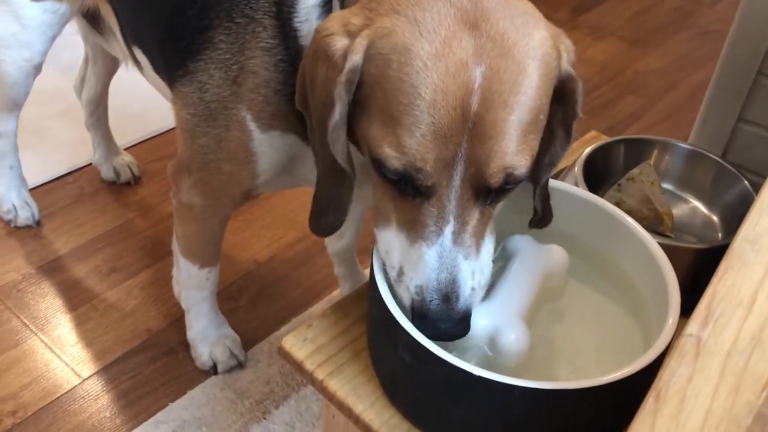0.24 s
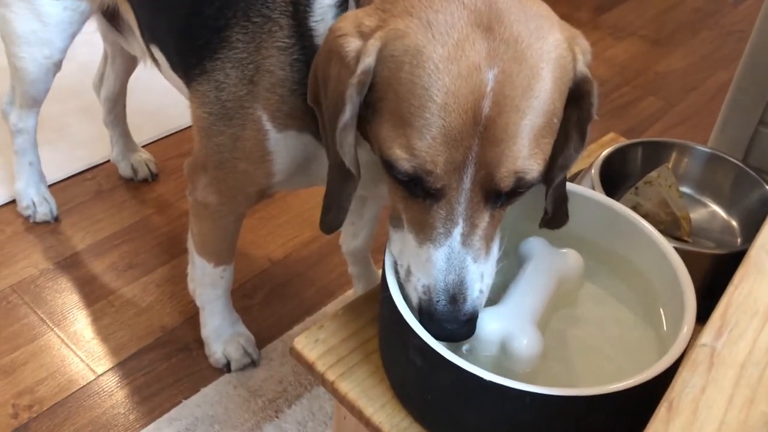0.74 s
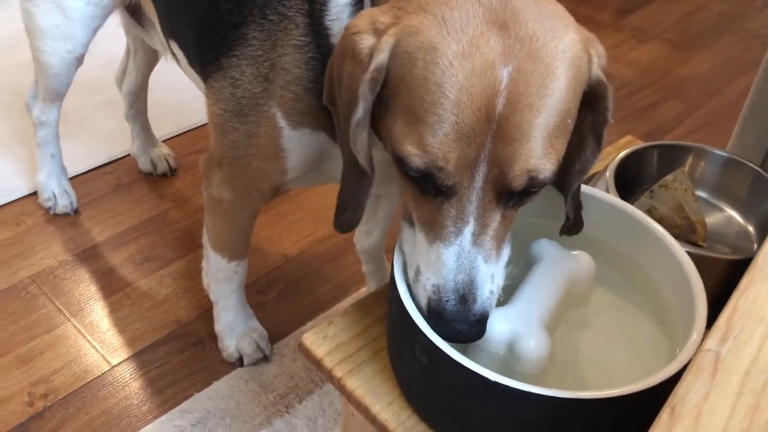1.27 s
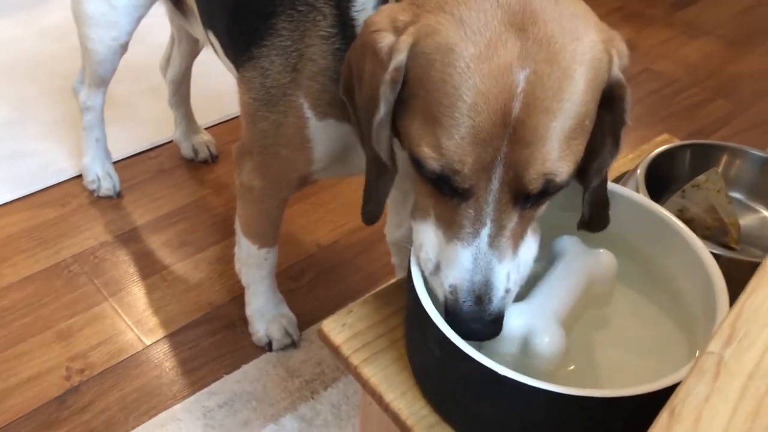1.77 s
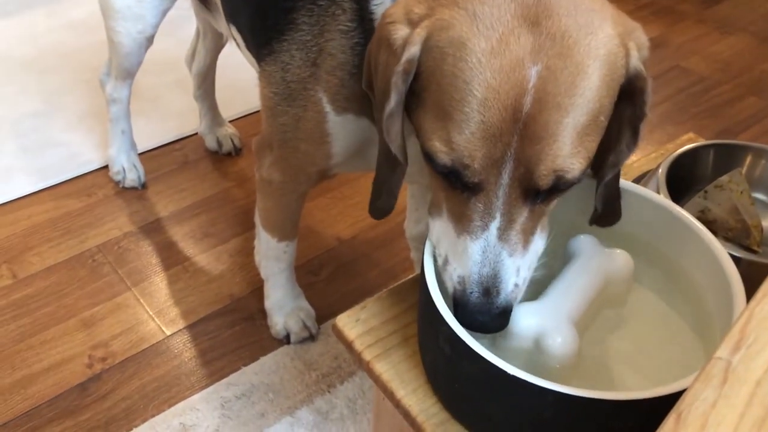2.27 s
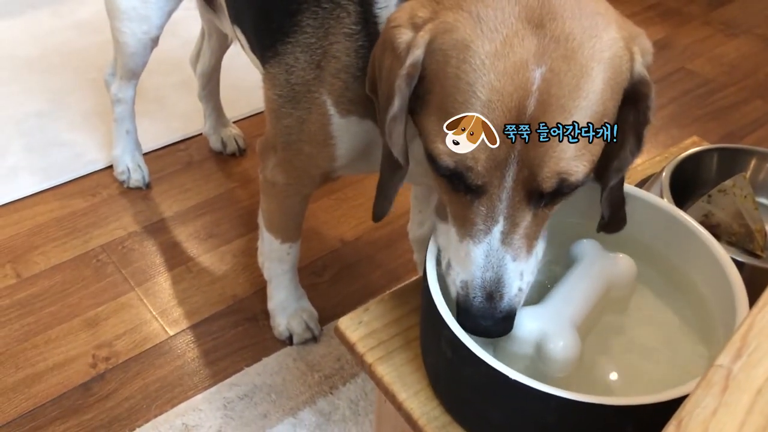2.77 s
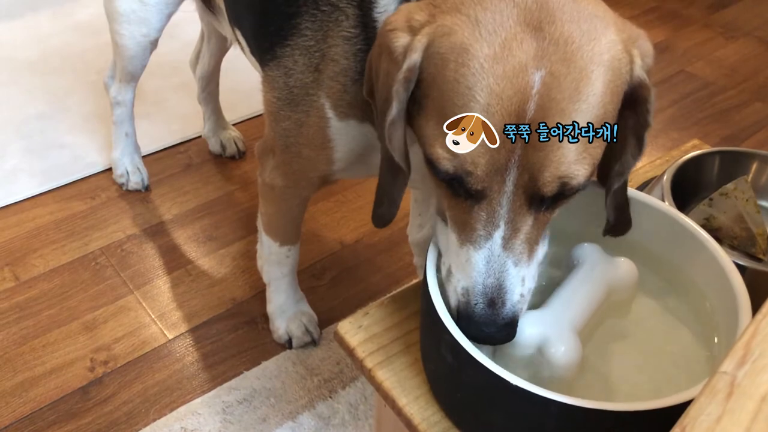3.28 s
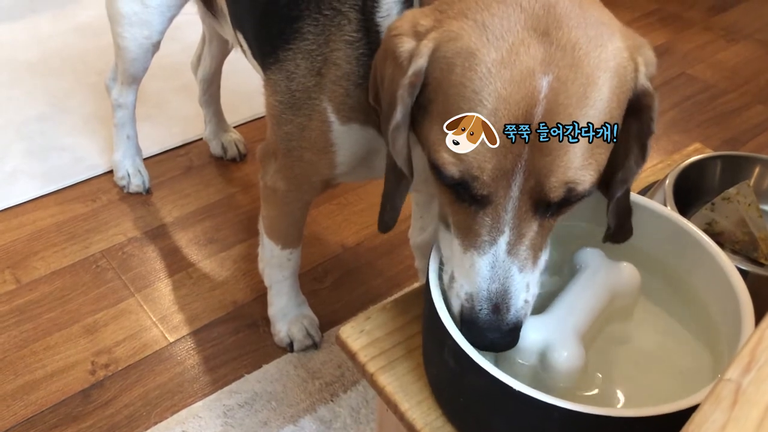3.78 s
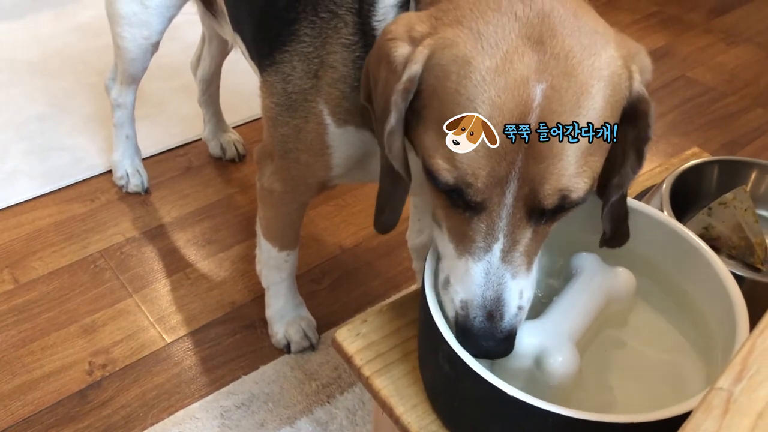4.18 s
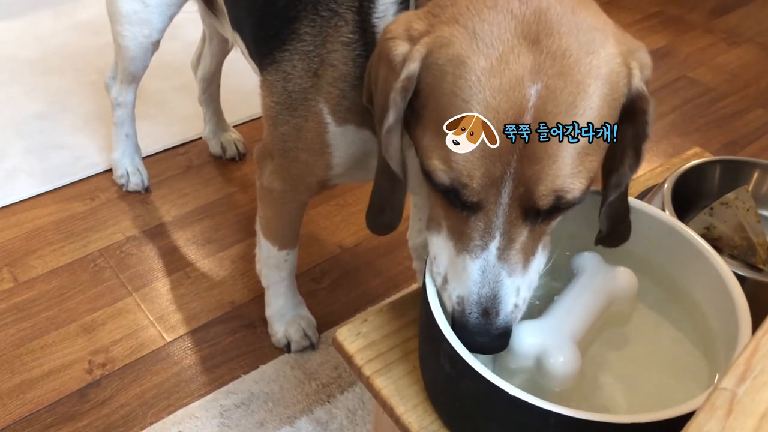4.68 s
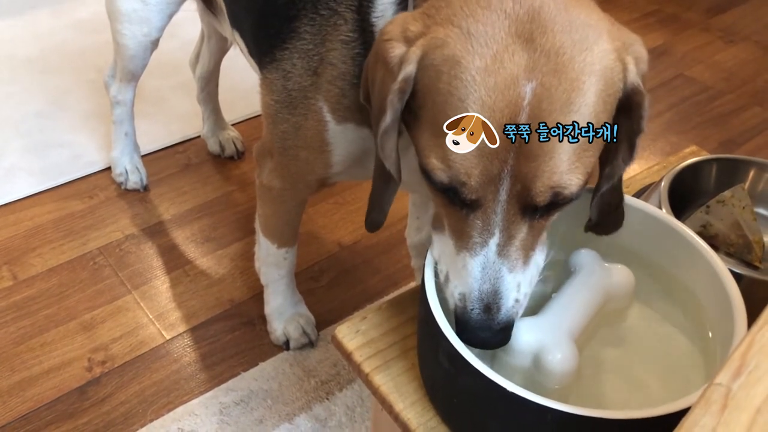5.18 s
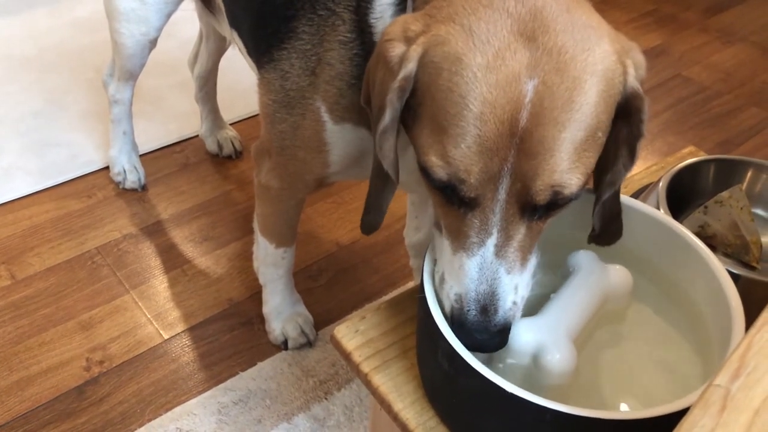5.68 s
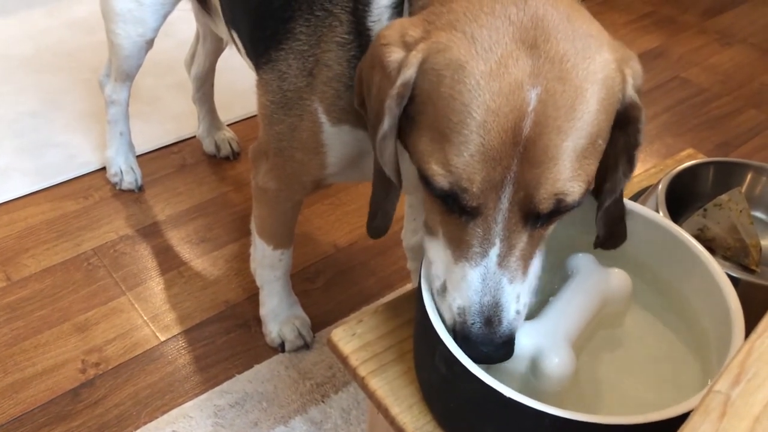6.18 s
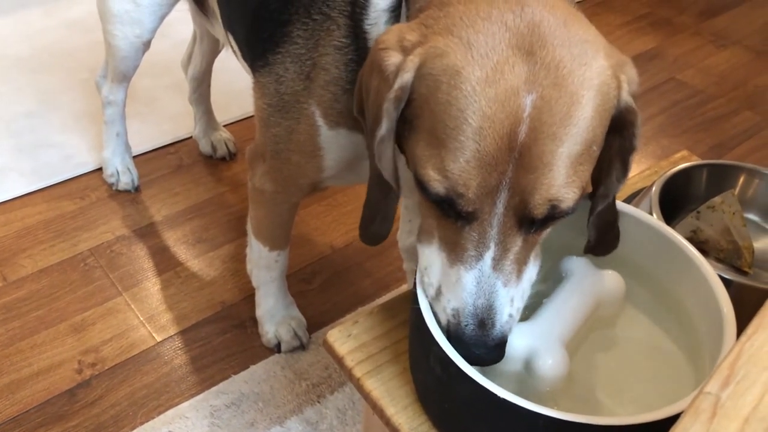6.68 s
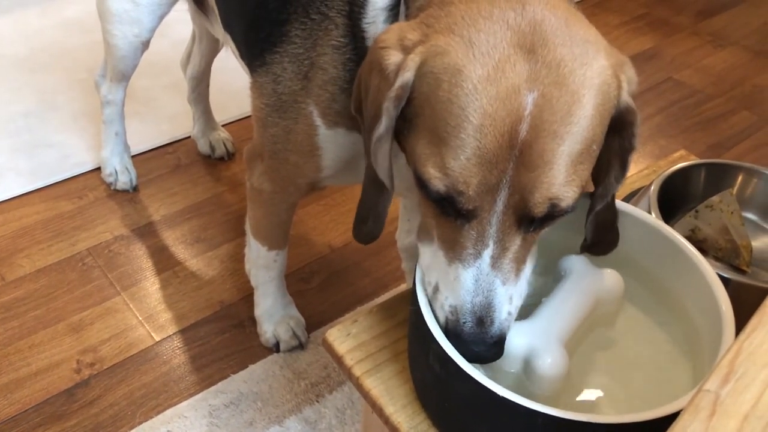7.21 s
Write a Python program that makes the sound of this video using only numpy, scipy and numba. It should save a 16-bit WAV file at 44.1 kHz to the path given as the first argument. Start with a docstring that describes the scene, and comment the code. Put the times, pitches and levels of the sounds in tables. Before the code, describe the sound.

A dog laps water from a wide bowl in quick, even wet strokes, with plops, ticks and low glugs, in a quiet room.

```python
"""A dog laps water from a wide bowl: each tongue stroke stirs up a fading slosh of bubble swarms, shaped noise
smacks its surface films, and gliding sines give the single plops and ticks and the low glug that follows.
Faint dips, plips, drips and throat gurgles fill in; resonances of the air in the bowl colour the small sounds.
A quiet, hard-floored room adds a short noise-built tail, filtered-noise hum and a swelling rumble.
A phone at arm's length cuts the top."""
import sys
import numpy as np
from scipy import signal
from scipy.fft import rfft, irfft, next_fast_len
from scipy.io import wavfile
from scipy.ndimage import uniform_filter1d
from numba import njit

SR = 44100
rng = np.random.default_rng(int(sys.argv[2]) if len(sys.argv) > 2 else 0)


def inscribe(sig):
    """Save sig as 16-bit PCM at rate SR to the path in sys.argv[1].

    A 1-D sig is mono; a 2-D sig holds one channel per row.
    Samples are clipped to [-1, 1] before scaling.
    """
    pcm = np.round(np.clip(np.atleast_2d(sig).T, -1, 1) * 32767)
    wavfile.write(sys.argv[1], SR, pcm.astype(np.int16))


N = 328539


def undb(db):
    """Amplitude factor of a level in dB."""
    return 10 ** (np.asarray(db) / 20)


def unit(x):
    """Scale to rms 1."""
    return x / np.sqrt(np.mean(x ** 2))


def on_log(hz, points):
    """A (Hz, dB) spectrum read on a log-frequency axis."""
    point_hz, db = np.transpose(points)
    return np.interp(np.log(np.maximum(hz, 1)), np.log(point_hz), db)


def band(x, hz, width_hz):
    """One resonance, gain 1 at its centre."""
    b, a = signal.iirpeak(hz, hz / width_hz, fs=SR)
    return signal.lfilter(b, a, x)


def walk(rate_hz):
    """Random levels drawn at a rate and joined by ramps; rms 1."""
    hold = int(SR / rate_hz)
    steps = np.repeat(rng.standard_normal(N // hold + 1), hold)
    return unit(uniform_filter1d(steps, hold)[:N])


def swell(s, db, rise_s, fade_s):
    """An envelope that swells quickly from each time and dies away."""
    env = np.zeros(N)
    np.add.at(env, (s * SR).astype(int), undb(db))
    rise, fade = np.exp(-1 / (np.array([rise_s, fade_s]) * SR))
    env = signal.lfilter([1], [1, -fade], env)
    return signal.lfilter([(1 - rise) ** 2], [1, -2 * rise, rise ** 2], env)


@njit
def grains(n, peak_s, gain, hz, rise_s, glide, turn, sr):
    """Bubbles: sines that swell, die away and climb in pitch once past their peak."""
    out = np.zeros(n)
    for k in range(len(hz)):
        rise = rise_s[k] * sr
        first = int(peak_s[k] * sr - rise)
        for i in range(int(6 * rise)):
            if 0 <= first + i < n:
                u = i / rise  # 1 at the peak
                climb = glide * (u - 1) ** 2 / 2 * (u > 1)
                cycles = hz[k] * rise_s[k] * (u + climb) + turn[k]
                envelope = (u * np.exp(1 - u)) ** 2
                out[first + i] += gain[k] * envelope * np.sin(2 * np.pi * cycles)
    return out


# Level of small bubbles against pitch. Each row: pitch in Hz, relative level in dB.
BUBBLE_SPECTRUM = [(250, -10), (500, -15), (1000, -5), (2000, 2), (4000, 3), (8000, 4.5), (15000, 4.5)]


def swarm(low_hz, high_hz, cycles, spread_db, count):
    """Many small bubbles at chance times, pitches and levels; rms 1."""
    when, pitch, size, long, turn = rng.random((count, 5)).T.copy()
    hz = low_hz * (high_hz / low_hz) ** pitch
    rarity = -np.log(size + 0.04)
    gain = undb(on_log(hz, BUBBLE_SPECTRUM) + spread_db * rarity)
    rise_s = cycles * (0.37 + long) / hz
    return unit(grains(N, when * N / SR, gain, hz, rise_s, 0.015, turn, float(SR)))


# Spectrum of the room noise. Each row: frequency in Hz, relative density in dB per Hz.
ROOM_SPECTRUM = [(15, -40), (25, -17), (93, 8), (219, -2), (952, -10), (1350, -15.5), (1630, -10.5),
                 (2130, -20), (2930, -19.5), (3630, -20.5), (8100, -30), (15000, -33)]
ROOM_TONE_DB = -53


def room_tone():
    """Steady air and appliance noise: white noise shaped in the frequency domain."""
    n = next_fast_len(N)
    hz = np.arange(n // 2 + 1) * SR / n
    spectrum = rfft(rng.standard_normal(n)) * undb(on_log(hz, ROOM_SPECTRUM))
    return undb(ROOM_TONE_DB) * unit(irfft(spectrum, n)[:N])


# Level of the deep rumble, ramped between rows. Each row: time in seconds, rms level in dB.
RUMBLE_LEVELS = [(0.0, -78), (3.03, -61), (3.22, -46), (3.959, -62.5), (5.35, -54), (7.35, -69),
                 (7.45, -55)]


def rumble():
    """Narrow noise near 61 Hz that swells now and then."""
    s, db = np.transpose(RUMBLE_LEVELS)
    deep = unit(band(band(rng.standard_normal(N), 60.5, 24), 61.5, 30))
    return undb(np.interp(np.arange(N) / SR, s, db)) * deep


def room_tail(x, t60_s=0.28):
    """Dense noise echoes of the hard room, duller as they age."""
    age_s = np.arange(int(0.5 * SR)) / SR
    low, high = rng.standard_normal((2, len(age_s)))
    echo = band(low, 540, 1600) * undb(-60 * age_s / t60_s)
    echo += 0.61 * high * undb(-60 * age_s / (0.76 * t60_s))
    echo *= age_s > 0.004
    return signal.fftconvolve(x, echo / np.sqrt(np.sum(echo ** 2)))[:N]


# Swallows, about every fourth stroke. Each row: start in seconds, drive of the envelope in dB.
SWALLOW_TIMES = [(0.814, -45), (2.385, -40), (3.625, -38), (5.223, -46.5), (6.83, -37.5)]


def swallows():
    """Soft, dull throat gurgle: a low bubble swarm under short swells."""
    s, db = np.array(SWALLOW_TIMES).T
    gurgle = swarm(312.0, 1050.0, cycles=1.49, spread_db=-3.5, count=1500)
    return swell(s, db, 0.0022, 0.022) * gurgle


def drips():
    """Sparse faint drops from the muzzle all the while."""
    return undb(-69.5) * swarm(1530.0, 14000.0, cycles=3.86, spread_db=-0.5, count=220)


# The bowl's air modes. Each row: centre in Hz, width in Hz, gain in dB.
BOWL_MODES = [(682, 125, 16.5), (945, 224, 6), (1612, 323, 8), (2480, 354, 3), (4600, 800, -17)]


def in_bowl(x):
    """Parallel resonances of the air in the bowl, added to the direct sound."""
    return 0.75 * x + sum(undb(db) * band(x, hz, width_hz) for hz, width_hz, db in BOWL_MODES)


# Snapping films and droplets. Each row: start in seconds, drive in dB, treble against body in dB.
SNAP_CLICKS = [(0.1291, -37, -28), (0.1627, -21, -24), (0.202, -23, -19), (0.3093, -27, -30),
               (0.4509, -38, -33), (0.529, -25.5, -19), (1.0213, -24.5, 1), (1.3168, -33.5, -29),
               (1.3688, -19, -11), (1.445, -28.5, 5.5), (1.726, -46, -26), (1.745, -29, -16),
               (1.7566, -13.5, -5), (2.133, -25, -19), (2.146, -17.5, -2.5), (2.608, -33, -8),
               (2.6207, -20, 3.5), (2.967, -17.5, -3.5), (3.142, -39, -28), (3.336, -27, -18),
               (3.354, -18.5, -22), (4.021, -30, -19), (4.204, -20.5, -14), (4.565, -45, -20),
               (4.586, -16, -30), (4.9648, -22.5, -19), (5.3863, -35.5, -21), (5.463, -17.5, -1),
               (5.822, -21.5, -28), (6.1288, -39.5, -27), (6.1988, -23, -6), (6.583, -13.5, -10.5),
               (6.737, -42, 6), (7.0854, -21.5, 3), (7.244, -29.5, -2), (7.3686, -33, -30)]


def snaps():
    """Wet clicks of band noise: a body for the bowl to colour and a bright edge."""
    s, db, treble_db = np.array(SNAP_CLICKS).T
    crest = 3  # noise peaks stand about three times over its rms
    rise_s = 0.00095
    ragged = undb(3.06 * walk(300)) / crest
    body_noise = unit(band(band(rng.standard_normal(N), 2700, 3700), 2940, 8900))
    edge_noise = unit(band(rng.standard_normal(N), 10400, 7000))
    body = ragged * swell(s, db, rise_s, 0.0062) * body_noise
    edge = ragged * swell(s, db + treble_db, rise_s, 0.0038) * edge_noise
    return body, edge


# Tongue strokes. Each row: start in seconds, stroke level in dB, fizz against slosh in dB,
# peak of the following glug in dB.
STROKES = [(0.134, -31, 6.5, -47), (0.528, -27.5, 5, -36.5), (1.024, -35.5, 6.5, -41),
           (1.374, -28, 0.5, -37), (1.749, -29, 5.5, -46), (2.131, -31.5, 1.5, -35),
           (2.613, -25.5, -0.5, -37.5), (2.968, -27, 2, -37), (3.344, -24, -1.5, -36),
           (3.842, -24.5, 2.5, -42), (4.212, -23, -3.5, -43), (4.568, -27, 0.5, -43),
           (4.964, -27.5, -0.5, -32), (5.457, -27, 1, -38), (5.812, -28, 2.5, -36), (6.197, -29, -2, -33.5),
           (6.584, -32.5, 2.5, -40), (7.088, -27.5, -2, -32), (7.418, -26, 5.5, -38)]
# nominal rise constant, time in the water; layers scale the latter by their share
RISE_S, STAY_S = 0.0086, 0.2005
# nominal t60 at the usual level; harder strokes die away faster
FADE_T60_S, USUAL_DB, FADE_S_PER_DB = 0.66, -25, 0.0563
SLOSH_UNDER_STROKE_DB = -17.5


def strokes(late_s, fade_share, stay_share, settle_s, extra_db):
    """Loudness of stirred water: rises at each stroke, fades, and settles once the tongue is out."""
    env = np.zeros(N)
    age_s = np.arange(int(0.6 * SR)) / SR
    for (s, db, _, _), more_db in zip(STROKES, extra_db):
        t60_s = max(FADE_T60_S - FADE_S_PER_DB * (db - USUAL_DB), 0.2)
        shape = undb(db + more_db - 60 * age_s / (t60_s * fade_share))
        shape *= (1 - np.exp(-age_s / RISE_S)) ** 2
        # the tongue splashes again as it pulls out
        shape *= 1 + 1.45 * np.exp(-((age_s - 0.923 * STAY_S) / 0.032) ** 2)
        shape /= 1 + np.exp((age_s - stay_share * STAY_S) / settle_s)
        first = int((s + late_s) * SR)
        env[first:first + len(age_s)] += shape[:N - first]
    return env


DIP_AHEAD_S, DIP_DB = 0.013, -19.5  # lead on the stroke, drive against its level


def dips():
    """The tongue tip breaks the surface: a faint bubble patter just ahead of each stroke."""
    s, db = np.array(STROKES).T[:2]
    patter = swarm(1500.0, 7000.0, cycles=2.52, spread_db=5.0, count=6000)
    return swell(s - DIP_AHEAD_S, db + DIP_DB, 0.0031, 0.011) * patter


def plips():
    """Lesser bubbles and ticks, few enough to be told apart, that follow the stirred water."""
    sparse = swarm(582.0, 9250.0, cycles=2.976, spread_db=6.0, count=1600)
    stirred = strokes(0.0014, 1.196, 1.02, 0.028, np.zeros(len(STROKES)))
    return undb(SLOSH_UNDER_STROKE_DB - 4.5) * sparse * stirred


GLUG_AFTER_S, GLUG_HZ, GLUG_SPREAD = 0.106, 305, 0.06  # spread: share of the pitch, either way


def glugs():
    """Water closes behind the tongue: large air pockets ring low for a few cycles."""
    s, _, _, db = np.array(STROKES, float).T
    tune, turn = rng.random((len(s), 2)).T.copy()
    hz = GLUG_HZ * (1 + GLUG_SPREAD * (2 * tune - 1))
    return grains(N, s + GLUG_AFTER_S, undb(db), hz, 2.23 / hz, 0.004, turn, float(SR))


# Single bubbles and bright ticks, loud and faint.
# Each row: time of the peak in seconds, peak level in dB, pitch in Hz.
SINGLE_BUBBLES = [(0.132, -28, 1820), (0.156, -34, 6660), (0.157, -28, 2240), (0.167, -26, 996),
                  (0.168, -25, 2630), (0.202, -23, 4540), (0.203, -24.5, 6400), (0.313, -31.5, 5000),
                  (0.318, -32, 3000), (0.453, -33.5, 4170), (0.465, -36, 6500), (0.529, -23, 2220),
                  (0.543, -27.5, 657), (0.542, -26.5, 1790), (0.545, -21, 3840), (0.604, -24, 4800),
                  (0.688, -32.5, 2280), (0.71, -39, 6500), (0.823, -39.5, 924), (0.949, -31, 6750),
                  (0.948, -38, 2260), (1.03, -31.5, 934), (1.038, -28, 3000), (1.04, -29, 706),
                  (1.088, -33, 745), (1.092, -37, 12300), (1.111, -28.5, 1610), (1.122, -34, 517),
                  (1.189, -31.5, 2970), (1.192, -40.5, 7800), (1.233, -42.5, 310), (1.351, -28, 1800),
                  (1.379, -20, 1610), (1.447, -21.5, 1700), (1.451, -26, 655), (1.549, -31, 1650),
                  (1.728, -35.5, 5950), (1.745, -33, 6800), (1.76, -18, 4050), (1.76, -20.5, 773),
                  (1.763, -21, 1920), (1.829, -28.5, 650), (1.844, -28.5, 5480), (1.911, -34.5, 1780),
                  (2.082, -41.5, 8060), (2.133, -37, 6570), (2.139, -28, 2740), (2.146, -28, 1660),
                  (2.147, -27.5, 830), (2.152, -28.5, 1760), (2.189, -28.5, 606), (2.215, -30.5, 5750),
                  (2.281, -31, 1850), (2.287, -30.5, 2590), (2.328, -36, 14200), (2.391, -35.5, 535),
                  (2.407, -27, 630), (2.555, -37, 2800), (2.586, -37, 2900), (2.61, -32, 6400),
                  (2.624, -23, 4860), (2.626, -22.5, 900), (2.63, -28, 2620), (2.636, -27.5, 2760),
                  (2.666, -37, 5770), (2.703, -32, 3000), (2.709, -30.5, 5560), (2.785, -32.5, 940),
                  (2.79, -40.5, 2900), (2.972, -16, 2560), (2.973, -7, 1617), (2.986, -29, 840),
                  (2.992, -29, 9100), (2.991, -20, 2490), (2.995, -28.5, 725), (3.031, -38, 7400),
                  (3.054, -38, 4170), (3.135, -31, 710), (3.144, -24.5, 5660), (3.289, -43, 6350),
                  (3.351, -28, 1630), (3.355, -30, 6500), (3.365, -24, 1730), (3.364, -20, 860),
                  (3.375, -27, 576), (3.383, -30, 10500), (3.402, -31, 1700), (3.475, -37, 2970),
                  (3.504, -24, 1605), (3.525, -34.5, 2560), (3.65, -45.5, 6650), (3.668, -41, 2120),
                  (3.844, -29.5, 1650), (3.866, -29.5, 880), (3.873, -27, 2500), (3.937, -33.5, 6440),
                  (4.024, -28, 1670), (4.164, -45.5, 6440), (4.194, -37, 1660), (4.258, -30, 784),
                  (4.372, -29.5, 713), (4.512, -32, 2830), (4.566, -31, 3960), (4.566, -31, 2250),
                  (4.58, -29, 2170), (4.59, -20.5, 957), (4.593, -19.5, 1840), (4.608, -24.5, 710),
                  (4.652, -25.5, 1590), (4.711, -45, 6090), (4.767, -35.5, 1740), (4.881, -44.5, 6700),
                  (4.98, -27, 5400), (4.989, -28, 673), (4.988, -22.5, 4630), (5.018, -25, 1700),
                  (5.025, -27, 1570), (5.046, -26.5, 1670), (5.238, -35.5, 690), (5.264, -29, 694),
                  (5.388, -35, 2660), (5.434, -34.5, 1810), (5.46, -14.5, 2410), (5.47, -26.5, 893),
                  (5.475, -29, 7600), (5.527, -22, 740), (5.55, -27, 1580), (5.636, -30, 4840),
                  (5.751, -31.5, 2600), (5.777, -39, 1820), (5.812, -18.5, 1930), (5.826, -27, 7420),
                  (5.825, -23.5, 924), (5.829, -23, 2560), (5.843, -22, 700), (5.859, -25.5, 705),
                  (5.875, -27, 1630), (5.944, -29.5, 2500), (5.986, -27.5, 1560), (6.131, -43, 7200),
                  (6.149, -32.5, 6430), (6.176, -27, 1870), (6.194, -25, 2380), (6.204, -24.5, 2570),
                  (6.206, -26.5, 1590), (6.206, -27.5, 930), (6.215, -25, 2460), (6.278, -30.5, 1640),
                  (6.377, -28.5, 1590), (6.587, -18, 1590), (6.588, -21, 2540), (6.588, -22, 4870),
                  (6.597, -24.5, 677), (6.627, -29.5, 4770), (6.659, -35, 1750), (6.668, -29.5, 1845),
                  (6.718, -45, 6430), (6.738, -30.5, 6130), (6.838, -37, 637), (7.064, -44, 5470),
                  (7.089, -27.5, 6880), (7.091, -31.5, 2300), (7.101, -26.5, 780), (7.148, -39, 7740),
                  (7.174, -33, 4670), (7.24, -29.5, 1580), (7.261, -29.5, 2680), (7.418, -27.5, 1780),
                  (7.446, -22, 1710)]
# rise at 1 kHz; higher bubbles are quicker by this power of pitch
SWELL_1K_S, SWELL_POWER = 0.002657, 0.5


def bubbles():
    """Single plops and ticks as gliding sines, each with three shorter, higher neighbours."""
    s, db, hz = np.array(SINGLE_BUBBLES, float).T
    rise_s = SWELL_1K_S * (1000 / hz) ** SWELL_POWER
    out = grains(N, s, undb(db), hz, rise_s, 0.0045, rng.random(len(s)), float(SR))
    for _ in range(3):
        shift, up, turn = rng.random((len(s), 3)).T.copy()
        near_s = s + rise_s * 2.523 * (shift - 0.4)
        near_hz = np.minimum(hz * 1.05 * 3.26 ** up, 15000)
        near_gain = undb(db - 1.0 - 16.0 * up)
        out += grains(N, near_s, near_gain, near_hz, 1.513 / near_hz, 0.009, turn, float(SR))
    return out


def slosh():
    """Clumped bubble swarms: middle ones a moment first, then fizz and big low ones almost together."""
    gurgle = swarm(256.0, 1312.0, cycles=1.824, spread_db=4.0, count=2400)
    churn = swarm(1268.0, 4740.0, cycles=3.516, spread_db=1.0, count=7000)
    fizz = swarm(3500.0, 15500.0, cycles=7.5, spread_db=-0.5, count=20000)
    fizz_db = np.array(STROKES)[:, 2]
    no_db = np.zeros(len(STROKES))
    clumps = walk(70)  # shared by middle and high
    low = gurgle * undb(-4.0 + 3.4 * walk(45)) * strokes(0.0011, 1.0, 0.93, 0.015, no_db)
    middle = churn * undb(-3.0 + 4.04 * clumps) * strokes(-0.012, 0.8, 0.95, 0.047, no_db)
    high = fizz * undb(6.16 * clumps) * strokes(-0.0029, 0.65, 0.84, 0.022, fizz_db)
    return undb(SLOSH_UNDER_STROKE_DB) * (low + middle + high)


def scene():
    """Bowl-coloured small sounds, direct water sounds, their room tail and the background."""
    body, edge = snaps()
    small = slosh() + dips() + plips() + drips() + body
    water = in_bowl(small) + bubbles() + glugs() + edge + swallows()
    background = room_tone() + rumble()
    return (water + undb(-12.0) * room_tail(water) + background)[None]


def record(dry):
    """The phone cuts the top: a steep elliptic low-pass at 16 kHz."""
    low_pass = signal.ellip(10, 0.2, 70, 16000, fs=SR, output="sos")
    return signal.sosfilt(low_pass, dry)


dry = scene()
out = record(dry)
inscribe(out)
```